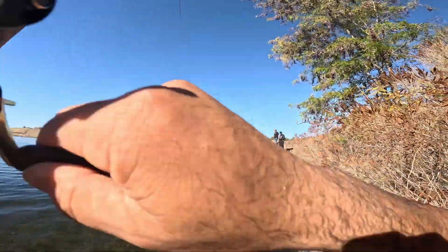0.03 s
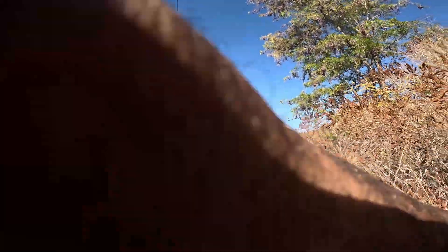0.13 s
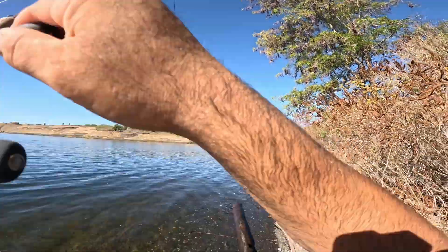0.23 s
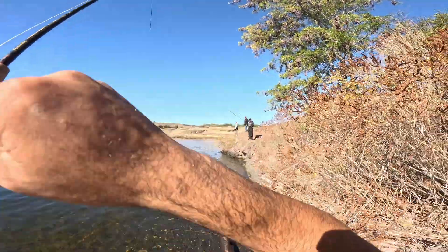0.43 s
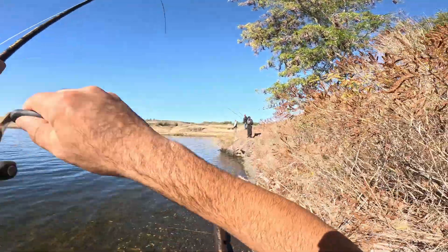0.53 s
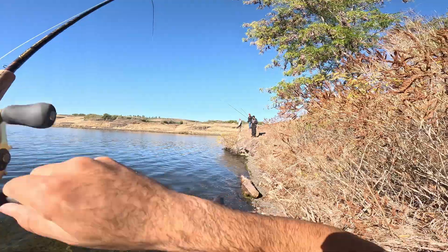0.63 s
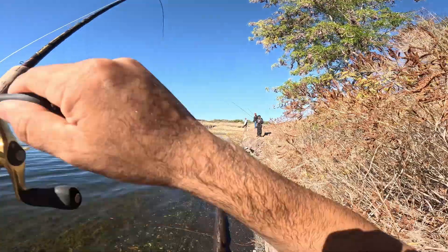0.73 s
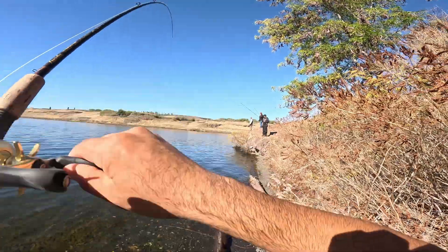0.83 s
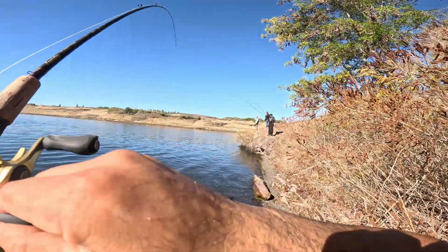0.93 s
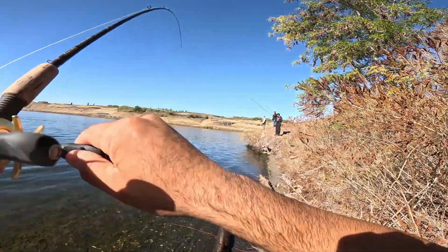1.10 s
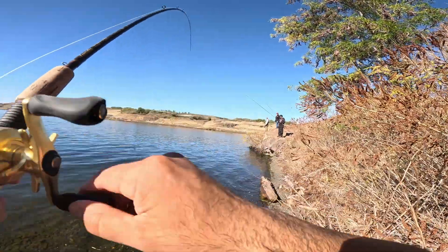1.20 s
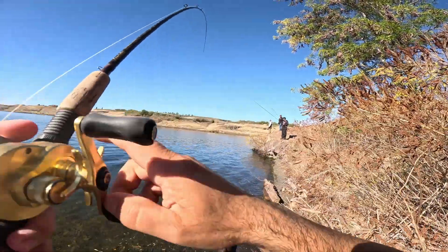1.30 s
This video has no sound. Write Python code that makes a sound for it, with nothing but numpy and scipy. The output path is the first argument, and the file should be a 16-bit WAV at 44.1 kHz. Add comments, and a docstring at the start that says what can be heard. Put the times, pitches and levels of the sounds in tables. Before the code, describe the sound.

A fishing reel clicks and ratchets with a grainy whir, interrupted early by one hard knock

```python
"""Fishing reel against a fish

A reel is cranked close to a body-worn camera on a quiet bank: its gears whir as grainy, swelling noise.
Line hisses off the spool, and the hand and sleeve swish past as short bands of noise that slide in pitch.
The drag slips in single ticks and two quick ratcheting runs: short rattles through metallic filters.
The hand knocks once on the camera: a swelling shudder, hard contacts and a slow shove.
Low noise is the rumble of light air on the microphone, over a faint steady hiss."""
import sys
import numpy as np
from scipy.fft import rfft, irfft, next_fast_len
from scipy.io import wavfile
from scipy.ndimage import uniform_filter1d, minimum_filter1d, map_coordinates

SR = 44100
rng = np.random.default_rng(int(sys.argv[2]) if len(sys.argv) > 2 else 0)


def wav_out(sig):
    """Save sig, one row per channel (or a flat mono array), as 16-bit PCM at SR to the path in sys.argv[1]."""
    wavfile.write(sys.argv[1], SR, np.round(np.clip(np.atleast_2d(sig).T, -1, 1) * 32767).astype(np.int16))


N = 59535
T = np.arange(N) / SR


def amp(db):
    """Decibels to gain."""
    return 10 ** (np.asarray(db) / 20)


def unit(x):
    """Scale to rms 1."""
    return x / np.sqrt(np.mean(x ** 2) + 1e-20)


def curves(rows):
    """One value per sample for each column after the time."""
    times, *columns = np.transpose(rows)
    return [np.interp(T, times, column) for column in columns]


def wobble(rate):
    """A smooth random curve with rate knots a second."""
    return map_coordinates(rng.standard_normal(N // 4), [T * rate], mode="wrap")


def coloured(x, points):
    """x through a causal (minimum-phase) filter of unit power, shaped by (frequency [Hz], level [dB])."""
    m = 2 * next_fast_len(N)
    hz, db = np.transpose(points)
    log_hz = np.log(np.fft.rfftfreq(m, 1 / SR) + 1)
    gain = unit(amp(np.interp(log_hz, np.log(hz), db)))
    # folding the cepstrum onto positive time makes the filter causal
    cepstrum = irfft(np.log(gain))
    cepstrum[1:m // 2] *= 2
    cepstrum[m // 2 + 1:] = 0
    response = np.exp(rfft(cepstrum))
    return irfft(rfft(x, m) * response, m)[:N]


def noise(points):
    """Coloured noise of rms 1."""
    return unit(coloured(rng.standard_normal(N), points))


def decay(t, t60):
    """A fall of 60 dB in t60 seconds."""
    return np.exp(-np.log(1000) * t / t60)


def grain():
    """Quick random level changes that make a noise grainy, at rms 1."""
    grain_per_s, grain_db = 320, 3
    return unit(amp(grain_db * wobble(grain_per_s)))


def contacts(rows, t60, tail_db):
    """A clean snap, a brief rattle and a faint tail for each (time [s], level [dB])."""
    rise_s, tail_t60_s = 0.00025, 0.051
    snap_share = 0.53  # snap against rattle, by energy norm
    out = np.zeros(N + SR)
    t = np.arange(SR // 20) / SR
    rise = 1 - np.exp(-(t / rise_s) ** 2)
    shape = rise * (decay(t, t60) + amp(tail_db) * decay(t, tail_t60_s))
    for s, db in rows:
        rattle = shape * np.sign(rng.standard_normal(len(t)))
        rattle[np.argmax(shape)] += snap_share * np.linalg.norm(shape)
        start = max(0, round(s * SR))
        out[start:][:len(t)] += amp(db) * rattle / np.hypot(1, snap_share)
    return out[:N]


def gears():
    """Meshing gears give a grainy whir that swells with each push on the handle."""
    # swells of the whir: (time [s], body level [dB], treble level [dB])
    whir_levels = [(0, -39, -48), (.17, -52, -50.5), (.24, -35.5, -46.5), (.3, -59, -63.5),
                   (.345, -48, -64), (.365, -42.5, -49), (.41, -53, -58), (.48, -59, -64),
                   (.59, -59.5, -68), (.63, -42, -47), (.68, -52.5, -54), (.76, -61.5, -66), (.8, -49, -61),
                   (.85, -56, -50.5), (.91, -46.5, -59), (.98, -51.5, -62), (1.03, -52.5, -59.5),
                   (1.12, -46.5, -49.5), (1.16, -46, -46.5), (1.25, -49.5, -48), (1.29, -47, -54.5),
                   (1.35, -54.5, -53)]
    # tone of the whir's body: (frequency [Hz], level [dB])
    body_colour = [(70, -24), (200, 0), (520, 1.5), (1300, -5), (2000, -11.5), (5000, -51)]
    # tone of the whir's treble: (frequency [Hz], level [dB])
    treble_colour = [(700, -22), (1700, 1), (3000, 2.5), (5600, -11), (9000, -20), (16000, -28)]
    body_db, treble_db = curves(whir_levels)
    body = amp(body_db) * grain() * noise(body_colour)
    treble = amp(treble_db) * grain() * noise(treble_colour)
    return body + treble


def line():
    """Taut line scrapes off the spool with a fine, grainy hiss while the reel is close."""
    # hiss of the line leaving the spool: (time [s], level [dB])
    line_levels = [(0, -53.5), (.14, -54.5), (.28, -67), (.32, -86)]
    # tone of the hiss: (frequency [Hz], level [dB])
    line_colour = [(2000, -8), (3500, 4), (8800, 3.5), (16000, -18)]
    level_db, = curves(line_levels)
    return amp(level_db) * grain() * noise(line_colour)


def swishes():
    """Each brush of hand or sleeve is a short, noisy resonance that slides in pitch, with a gritty skirt."""
    # brushes: (start [s], length [s], first pitch [Hz], last pitch [Hz], level [dB])
    brushes = [(-.004, 0.027, 146, 110, -28.5), (0.028, 0.018, 204.6, 264, -35),
               (0.035, 0.0091, 950, 1050, -38), (0.106, 0.017, 270, 301, -27.5),
               (0.12, 0.022, 350, 551, -38.5), (0.151, 0.025, 1150, 1048, -41),
               (0.174, 0.02, 520.4, 619, -32.5), (0.194, 0.00636, 593.3, 614, -19.5),
               (0.198, 0.03, 792, 480, -32), (0.354, 0.016, 376, 401, -39.5),
               (0.374, 0.022, 490, 1069, -42.5), (0.391, 0.02, 1325, 1506, -39.5),
               (0.417, 0.019, 1177, 1108, -39), (0.435, 0.01, 1117, 942, -39),
               (0.598, 0.0039, 331.6, 255.5, -34.5), (0.601, 0.0087, 1148, 1678, -36.5),
               (0.61, 0.017, 918, 950, -36.5), (0.621, 0.0336, 1194, 1626, -43),
               (0.678, 0.0089, 177.6, 148.9, -36.5), (0.904, 0.019, 563, 752, -46),
               (0.969, 0.016, 842, 750, -46.5), (1.009, 0.0097, 1302, 1274, -41.5),
               (1.049, 0.018, 2653, 2444, -45), (1.052, 0.05, 477, 560, -48),
               (1.092, 0.019, 1103, 1306, -48.5), (1.114, 0.018, 970, 901, -43.5),
               (1.146, 0.011, 999, 1086, -42), (1.237, 0.038, 2990, 2906, -48)]
    core_width = .2  # flutter rate over the sum of first and last pitch
    skirt_width, skirt_share = 1.7, .33  # flutter rate over first pitch; strength against the core

    def flutter(rate):
        """Random drift in both strength and phase."""
        return wobble(rate) + 1j * wobble(rate)

    out = np.zeros(N)
    for s, length, first_hz, last_hz, db in brushes:
        progress = np.clip((T - s) / length, 0, 1)
        swell = np.sin(np.pi * progress)
        pitch_hz = first_hz + (last_hz - first_hz) * progress
        phase = 2 * np.pi * np.cumsum(pitch_hz) / SR
        core = flutter(core_width * (first_hz + last_hz))
        skirt = skirt_share * flutter(skirt_width * first_hz)
        brush = swell * np.real((core + skirt) * np.exp(1j * phase))
        # give every brush the energy of its swell, however the flutter falls
        out += amp(db) * brush * np.linalg.norm(swell) / (np.linalg.norm(brush) + 1e-12)
    return out


def handling():
    """Dull rubbing on the camera body is dark noise that follows a level curve."""
    # strength of the rubbing: (time [s], level [dB])
    rub_levels = [(0, -38), (.1, -41), (.17, -81), (.25, -18), (.275, -34.5), (.31, -87)]
    # tone of the rubbing: (frequency [Hz], level [dB])
    rub_colour = [(50, -12), (130, 2), (260, -3), (450, -6), (1000, -44), (3000, -45), (9000, -83)]
    level_db, = curves(rub_levels)
    return amp(level_db) * noise(rub_colour)


def air():
    """Light air on the microphone is a low rumble that comes and goes."""
    # strength of the rumble: (time [s], level [dB])
    air_levels = [(0, -38), (.3, -51.5), (.37, -35.5), (.47, -56), (.86, -43), (.92, -49), (1.35, -46.5)]
    # tone of the rumble: (frequency [Hz], level [dB])
    air_colour = [(10, -4.5), (55, -10), (85, -19.5), (200, -25.5), (700, -93)]
    level_db, = curves(air_levels)
    return amp(level_db) * noise(air_colour)


def steady_hiss():
    """The open bank hisses alike in both ports; each port adds unrelated noise of its own."""
    # tone of the open bank: (frequency [Hz], level [dB])
    bank_colour = [(100, -16), (1300, 6), (4600, -3.5), (5500, -6), (7800, -10.5), (9500, -21),
                   (16000, -39)]
    # tone of each port's own hiss: (frequency [Hz], level [dB])
    port_colour = [(1000, 5), (4000, -19), (12500, 9.5), (16000, -7)]
    bank_db, port_db = -56.5, -71.5
    ports = np.array([noise(port_colour), noise(port_colour)])
    return amp(bank_db) * noise(bank_colour) + amp(port_db) * ports


def run_ticks(run):
    """The pawl drops, and rebounds, each time the spool has turned one more tooth."""
    # strength of the ticks in the runs, ahead of scatter and mix: (time [s], level [dB])
    run_levels = [(.6, -34), (.72, -36), (.79, -33.5), (.85, -36), (.9, -32), (1.12, -34), (1.175, -28.5),
                  (1.3, -31.5)]
    scatter_db = 1
    rebound_s, rebound_db = 0.0035, -13  # delay and level against the first hit
    s, rate = np.transpose(run)
    teeth = np.cumsum(np.interp(T, s, rate, left=0, right=0)) / SR
    tooth_numbers = np.arange(np.ceil(teeth[-1]))
    times = T[np.searchsorted(teeth, tooth_numbers, side="right")]
    levels = np.interp(times, *np.transpose(run_levels))
    levels = levels + scatter_db * rng.standard_normal(len(times))
    hits = list(zip(times, levels))
    rebounds = list(zip(times + rebound_s, levels + rebound_db))
    return hits + rebounds


def drag():
    """The clicker rings the reel's metal; its rings come and go as the reel tilts, the highest on the left."""
    # single slips of the drag, ahead of the mix: (time [s], level [dB])
    single_ticks = [(.0012, -38), (0.0139, -19.5), (0.039, -19.5), (0.0631, -19.5), (0.0877, -20),
                    (0.108, -21.5), (0.1237, -19), (0.138, -22.5), (0.155, -22), (0.182, -25.5),
                    (0.2125, -27.5), (0.3115, -39.5), (0.4216, -28.5), (0.4963, -30.5), (0.5629, -36.5),
                    (0.9296, -32), (0.9485, -33.5), (0.9655, -38), (0.9874, -36), (1.0305, -34.5),
                    (1.064, -33), (1.327, -33.5)]
    # the two ratcheting runs, each a list of: (time [s], tick rate [1/s])
    ratchet_runs = [
        [(.597, 69.9), (.645, 89.6), (.672, 117.3), (.71, 105.9), (.755, 99.9), (.795, 51.3), (.835, 122.6),
         (.885, 121.6), (.908, 57.6)],
        [(1.089, 58.9), (1.125, 73.1), (1.158, 110.4), (1.193, 52.3), (1.222, 121.4), (1.252, 114.6),
         (1.275, 76.6), (1.3, 54.7)],
    ]
    # tone of a tick right by the microphone: (frequency [Hz], level [dB])
    near_colour = [(300, -25), (1800, -22.5), (2700, -6.5), (3400, 0.5), (3800, -4), (4400, 4.5),
                   (5600, -6), (6400, -1), (8000, -5.5), (8800, -20), (9400, -6.5), (10000, -17),
                   (10700, -10.5), (11300, -13.5), (16000, -37)]
    # tone of a tick farther off: (frequency [Hz], level [dB])
    far_colour = [(300, -24), (1800, 1.5), (3100, 7.5), (4500, 7), (5500, 1), (6400, -2.5), (7200, 4),
                  (8400, -6), (9800, -8.5), (10800, -2.5), (11500, -5), (12500, -10), (16000, -16.5)]
    # low ring of the metal: (frequency [Hz], level [dB])
    low_colour = [(2600, -50), (3700, 12), (4500, 11.5), (5600, -20)]
    # middle ring of the metal: (frequency [Hz], level [dB])
    middle_colour = [(5800, -17), (7100, -0.5), (7700, -3.5), (8900, -22)]
    # high ring of the metal: (frequency [Hz], level [dB])
    whistle_colour = [(2000, -53), (6000, -16), (9700, -26), (10800, -20.5), (11300, -15), (12100, -2.5),
                      (12900, -13.5), (13700, -20), (14250, -19), (14750, -24), (15500, -14.5),
                      (16500, -11.5)]
    # the rings take turns as the reel tilts: (time [s], low [dB], middle [dB], high [dB])
    ring_levels = [(.13, -34, -9, -10.5), (.19, -28, -1.5, 1.5), (.5, -17, -34, -10.5), (.7, -24, -32, 1.5),
                   (.865, -1, -33, 1.5), (.895, -6, -7.5, -4), (1.03, -27, -7.5, -3.5), (1.2, -26, -32, -1)]
    near_until_s, lag_s = .28, 0.0011  # lag: listed time to start of contact
    near_db, far_db, run_db = -2, -4, -4  # mix of the plain ticks, not of the rings
    tick_t60_s, tail_db = 0.0067, -19.5

    near_rows = [(s + lag_s, db) for s, db in single_ticks if s < near_until_s]
    far_rows = [(s + lag_s, db) for s, db in single_ticks if s >= near_until_s]
    near = contacts(near_rows, tick_t60_s, tail_db)
    far = contacts(far_rows, tick_t60_s, tail_db)
    run_rows = run_ticks(ratchet_runs[0]) + run_ticks(ratchet_runs[1])

    def runs():
        """Both runs, with a fresh rattle at every call."""
        return contacts(run_rows, tick_t60_s, tail_db)

    def ring(level_db, colour):
        """All ticks heard through one ring of the metal."""
        return coloured(amp(level_db) * (near + far + runs()), colour)

    close = coloured(amp(near_db) * near, near_colour)
    distant = coloured(amp(far_db) * far + amp(run_db) * runs(), far_colour)
    low_db, middle_db, high_db = curves(ring_levels)
    both = close + distant + ring(low_db, low_colour) + ring(middle_db, middle_colour)
    left = both + ring(high_db, whistle_colour)
    return np.array([left, both])


def knock():
    """The camera body shudders ever harder, stiffens as the hand strikes and slips off, and is shoved slowly."""
    # hard contacts of the hand: (time [s], level [dB])
    cracks = [(.2452, -13.5), (.248, -4), (.2521, 4), (.2535, -5.5)]
    # tone of the contacts: (frequency [Hz], level [dB])
    crack_colour = [(90, 2), (300, 2.5), (470, -2.5), (570, 9), (730, 2), (950, -8.5), (1500, -13),
                    (2800, -13), (4200, -22), (5500, -35.5), (8000, -30), (10000, -49), (16000, -52)]
    crack_t60_s, crack_tail_db = 0.0048, -49
    knock_s, knock_db, swell_s, fade_s = .2505, -1, 0.0095, 0.0055
    base_hz, rise_hz, stiffen_s = 230.6, 101, 0.003  # pitch rises briefly around the blow
    push_s, push_width_s, push_db = .267, 0.0093, -12.5
    recoil_s, recoil_share = 0.011, 0.21  # delay after the push; strength against it

    t = T - knock_s
    pitch_hz = base_hz + rise_hz * np.exp(-(t / stiffen_s) ** 2)
    phase = 2 * np.pi * np.cumsum(pitch_hz) / SR
    phase_at_blow = np.interp(0, t, phase)  # puts a crest on the blow
    envelope = np.exp(-np.abs(t) / np.where(t < 0, swell_s, fade_s))
    shudder = amp(knock_db) * envelope * np.cos(phase - phase_at_blow)

    push = np.exp(-((T - push_s) / push_width_s) ** 2)
    recoil = np.exp(-((T - push_s - recoil_s) / (2 * push_width_s)) ** 2)
    shove = amp(push_db) * (recoil_share * recoil - push)
    blows = coloured(contacts(cracks, crack_t60_s, crack_tail_db), crack_colour)
    return shudder + shove + blows


def scene():
    """All is close, dry and central, except the clicker's top ring and the hiss of each port."""
    return gears() + line() + swishes() + handling() + air() + steady_hiss() + drag() + knock()


def record(dry):
    """A fast limiter ducks both ports together; the camera keeps nothing above its band limit."""
    ceiling, limit_samples, top_hz = .93, 89, 15950
    needed = np.minimum(1, ceiling / (np.abs(dry).max(axis=0) + 1e-9))
    held = minimum_filter1d(needed, size=limit_samples)
    gain = uniform_filter1d(held, size=limit_samples)
    m = 2 * next_fast_len(N)
    kept = np.fft.rfftfreq(m, 1 / SR) < top_hz
    return irfft(rfft(dry * gain, m) * kept, m)[:, :N]


dry = scene()
out = record(dry)
wav_out(out)
```